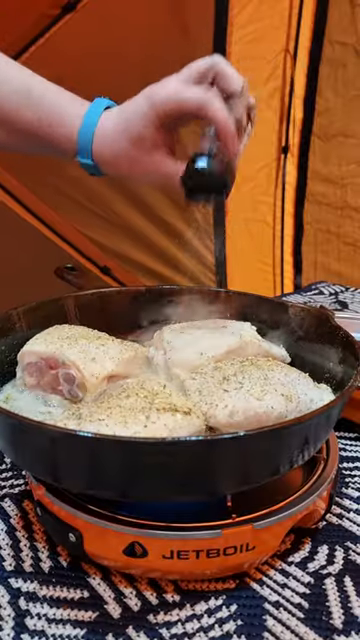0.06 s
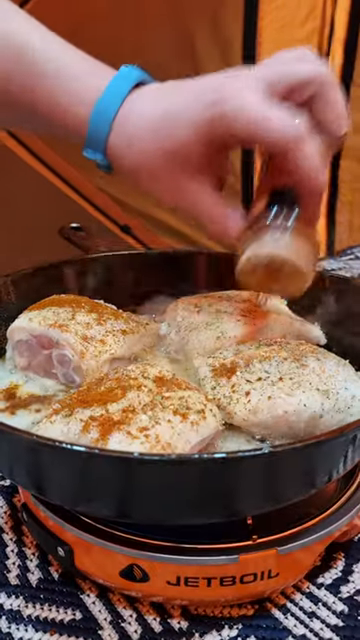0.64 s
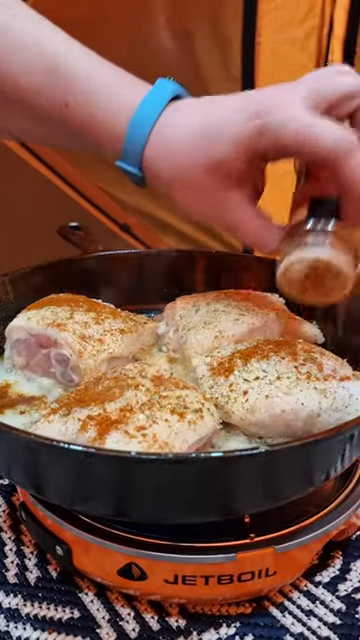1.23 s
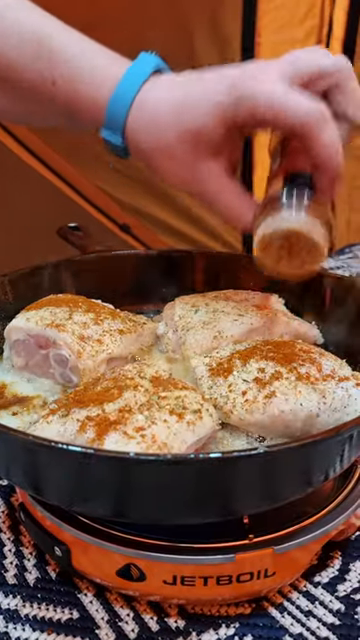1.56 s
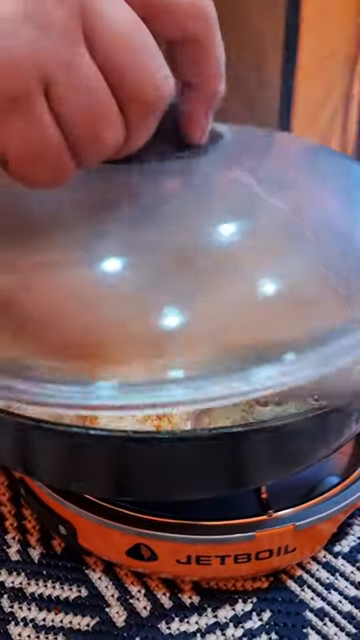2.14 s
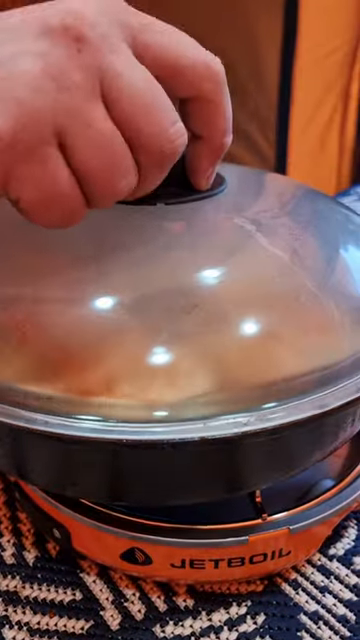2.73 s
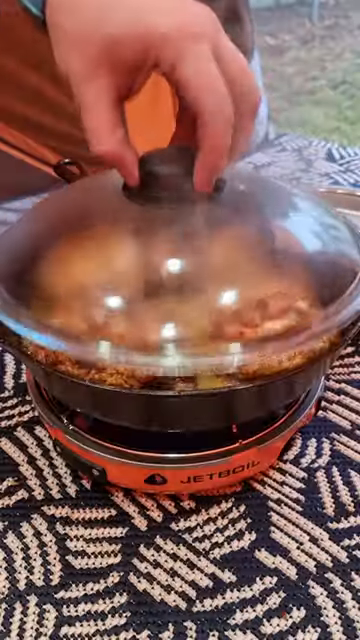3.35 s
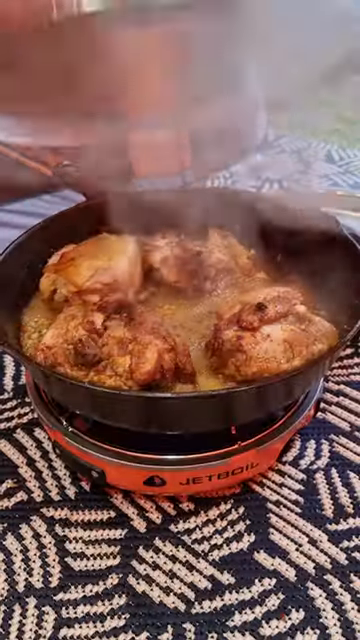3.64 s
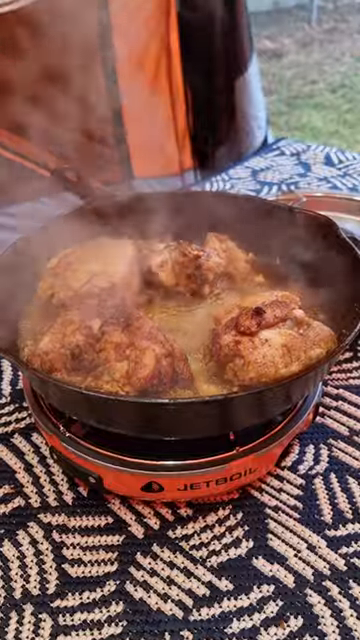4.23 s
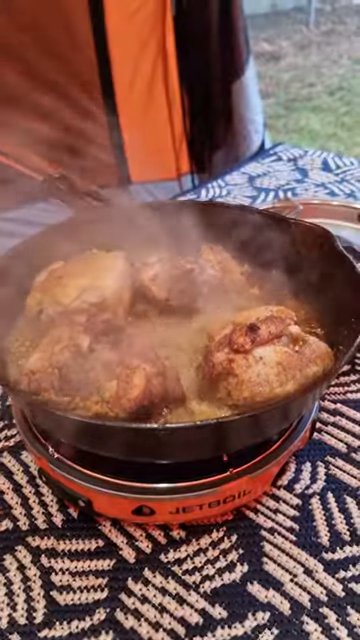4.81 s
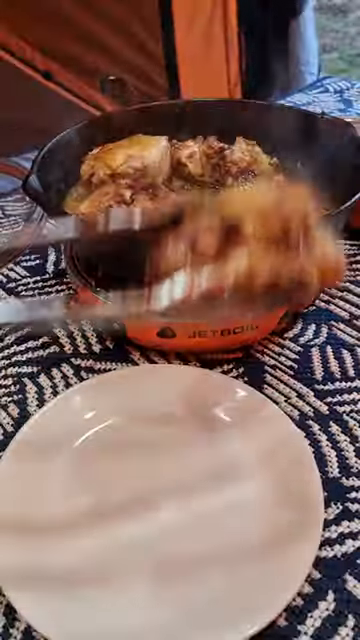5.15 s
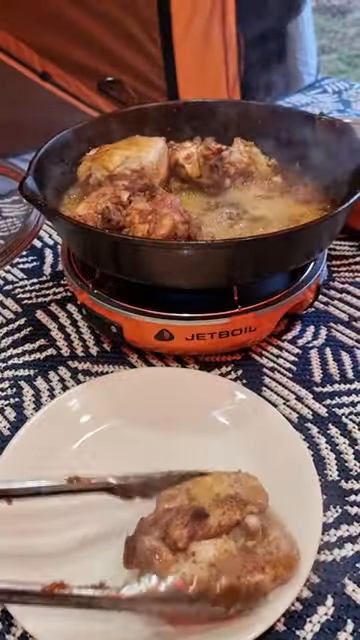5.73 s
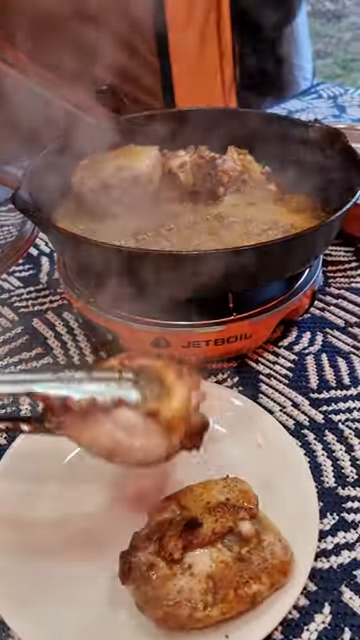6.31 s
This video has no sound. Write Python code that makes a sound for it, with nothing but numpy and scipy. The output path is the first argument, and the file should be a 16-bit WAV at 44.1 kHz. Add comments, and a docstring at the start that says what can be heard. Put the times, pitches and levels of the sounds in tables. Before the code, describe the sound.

Over the low rumble of a gas camp stove, chicken crackles in an iron pan while dry spice is lightly shaken. A glass lid lands in two quick, ringing clatters, the loudest sounds, and the frying goes dull. After a soft scrape as the lid lifts, the sizzle returns stronger, growing into a loud, bubbling boil with snapping fat and little steam spurts. It sounds close, with almost no echo inside the tent.

```python
"""Chicken sizzles in a cast iron skillet on a gas camp stove inside a tent.
Each bursting bubble rings briefly at the pitch of its size; larger ones spit through the fat.
Spice is shaken over the pan, then a glass lid clatters onto the rim, ringing glass and iron, and
muffles the sizzle. The lid is dragged off; the juices simmer, then boil up loudly, with spurts of steam.
The burner rumbles below, and the canvas scatters the sound of the pan."""
import sys
import numpy as np
from scipy import signal
from scipy.fft import rfft, irfft, next_fast_len
from scipy.io import wavfile

SR = 44100
rng = np.random.default_rng(int(sys.argv[2]) if len(sys.argv) > 2 else 0)


def to_wav(s):
    """Save 16-bit WAV."""
    ch = np.atleast_2d(s).T  # columns
    pcm = np.round(np.clip(ch, -1, 1) * 32767)  # PCM
    wavfile.write(sys.argv[1], SR, pcm.astype(np.int16))


N = 285327
TIME = np.arange(N) / SR
SIMMER_FROM_S, BOIL_FROM_S = 3.22, 5.1

# phase lead of the left channel over the right, for the whole pan: frequency_hz, lead_rad
PAN_PHASE = [(100, 0.058), (450, 0.65), (700, 1.74), (1200, 3.36), (1500, 4.24), (1900, 6.66), (2600, 8.92),
             (3800, 8.32), (5000, 10.96), (7500, 11.2)]
# normal modes of the skillet: pitch_hz, level_db, t60_s
IRON_MODES = [(402, -23.5, 0.52), (603, -24, 1), (646, -20.5, 0.18), (838, -13.5, 0.2),
              (1005.5, -0.5, 0.14), (1301, -3, .15), (1320, -24, 0.74), (1435, -14, 0.21),
              (1750, -34, 0.049), (1880, -12.5, 0.25), (2170, -16, 0.077), (2420, -3, 0.21),
              (2503, -26, 0.27)]


def sizzle(crackle_db, fizz_db):
    """Bubble populations superpose: crackle in three stages, lone pings, a low gurgle, a fine fizz."""
    # spectral envelope of each population: frequency_hz, gain_db
    sear_spectrum = [(200, -3), (480, -7), (800, 2.5), (1200, 0.5), (2000, 3.5), (3000, 2), (5000, -3),
                     (7200, -9), (9000, -21), (14000, -66)]
    simmer_spectrum = [(200, -10.5), (420, -12), (950, -14), (1300, -7), (1750, -3.5), (2400, -5.5),
                       (3600, -7), (5000, -11), (7200, -23), (9000, -31.5), (14000, -33)]
    boil_spectrum = [(250, -46), (680, -14.5), (1000, -19.5), (1500, -11), (2300, -2), (3000, -2),
                     (4000, -6.5), (5500, -13), (7500, -18.5), (9000, -25.5), (14000, -25.5)]
    ping_spectrum = [(900, -47), (2000, 3), (4000, 7.5), (7000, 4.5), (9000, -9.5), (15000, -46)]
    gurgle_spectrum = [(250, -14.5), (450, 5), (700, 4.5), (1100, -1), (1800, 7), (4000, -41)]
    fizz_spectrum = [(3000, -24), (7000, 3), (9000, 2), (11500, 1), (16000, 7)]
    # phase lead of the left channel, for the juice: frequency_hz, lead_rad
    juice_phase = [(100, .15), (450, 2.4), (700, 1.33), (1200, 2.7), (2000, 5.4), (3000, 8.3), (4000, 14.3),
                   (5000, 20), (6300, 21.3), (8000, 27.1)]
    # large slow bubbles well up: centre_s, level_db, half_length_s
    wellings = [(3.3, -48.5, 0.22), (5.48, -39, 0.068), (5.95, -40, 0.25), (6.18, -37.5, 0.022)]
    end_s = N / SR
    searing, simmering, boiling = (0, SIMMER_FROM_S), (SIMMER_FROM_S, BOIL_FROM_S), (BOIL_FROM_S, end_s)
    before_boil, juicy, always = (0, BOIL_FROM_S), (SIMMER_FROM_S, end_s), (0, end_s)
    sear = bubbles(PAN_PHASE, searing, density=6000, spread_db=6, clump_db=1.6, width=0.3, wet_db=0.5)
    simmer = bubbles(PAN_PHASE, simmering, density=4000, spread_db=3.5, clump_db=1.5, width=0.29,
                     wet_db=0)
    boil = bubbles(juice_phase, boiling, density=8000, spread_db=4, clump_db=1.78, width=0.13,
                   wet_db=1, bands=38)
    pings = bubbles(PAN_PHASE, before_boil, density=99, spread_db=3.5, clump_db=1.5, width=0.12,
                    wet_db=-4)
    gurgle = bubbles(juice_phase, juicy, density=4000, spread_db=2, clump_db=2.06, width=0.1,
                     wet_db=-9.5)
    fizz = bubbles(PAN_PHASE, always, density=7000, spread_db=4.6, clump_db=2.2, width=0.45, wet_db=8)
    crackle = (unit_rms_within(colour(sear, sear_spectrum), searing)
               + unit_rms_within(colour(simmer, simmer_spectrum), simmering)
               + unit_rms_within(colour(boil, boil_spectrum), boiling)
               + from_db(-8) * unit_rms(colour(pings, ping_spectrum)))
    return (from_db(crackle_db) * crackle
            + swells(wellings) * unit_rms_within(colour(gurgle, gurgle_spectrum), juicy)
            + from_db(fizz_db) * unit_rms(colour(fizz, fizz_spectrum)))


def bubbles(phase_lead, span_s, density, spread_db, clump_db, width, wet_db, bands=20):
    """Bubbles burst in random clumps, each a damped resonator tuned by its size; width is 1 / Q."""
    start, stop = (np.clip(span_s, 0, N / SR) * SR).astype(int)
    out, shared_drift = np.zeros((2, N)), drift(22)
    for hz in np.geomspace(300, 15000, bands):
        clumps = from_db(clump_db * (shared_drift + drift(45))[start:stop])
        chance = density * clumps * np.sqrt(hz / 1000) / bands / SR   # small bubbles outnumber large
        bursts = rng.random(N)[start:stop] < chance
        strengths = rng.exponential(1, N)[start:stop][bursts]
        polarity = (-1) ** np.arange(len(strengths))
        clicks = np.zeros(stop - start)
        clicks[bursts] = from_db(spread_db * np.minimum(strengths, 4.2)) * polarity
        out[:, start:stop] += tent(resonance(unit_rms(clicks), hz, width * hz), phase_lead, wet_db)
    return out


def cooking_levels():
    """Crackle, fizz and flame boom follow the cooking's vigour; the lid's insertion loss dims the pan."""
    # sear, simmer, boil: crackle_db, fizz_db, boom_db, vigour_change_db, ramp_s, lid_loss_db
    stages = [(-44, -56, -50.5, -5.5, 3.3, 6.5), (-35.5, -55.5, -44, -1, 2.4, 13),
              (-32, -57.5, -49, 7.5, 0.76, 0)]
    starts_s = np.array([0, SIMMER_FROM_S, BOIL_FROM_S])
    stage = np.searchsorted(starts_s[1:], TIME)
    crackle_db, fizz_db, boom_db, change_db, ramp_s, lid_loss_db = np.array(stages)[stage].T
    vigour_db = change_db * np.clip((TIME - starts_s[stage]) / ramp_s, 0, 1)
    vigour_db -= np.interp(TIME, [5.6, 5.7], [0, 2])   # the boil drops 2 dB at 5.6 s, then keeps climbing
    covered_s, lifted_s, clear_s = 2.45, 3.3, 3.504
    muffle_db = lid_loss_db * np.interp(TIME, [covered_s, lifted_s, clear_s], [1, 1, 0], left=0)
    return (crackle_db + vigour_db - muffle_db,
            fizz_db + 1.62 * vigour_db - 0.6 * muffle_db,
            boom_db + 0.5 * vigour_db)


def fat_spits():
    """Impulse excitation: a large steam bubble snaps through the fat with a crack and a short ring."""
    # the loudest spits: start_s, level_db, pitch_hz
    spits = [(0.0288, -31.5, 1980), (0.0713, -29.5, 1750), (0.3618, -30, 2040), (0.398, -22, 3160),
             (0.487, -23.5, 1610), (0.5326, -21, 2840), (1.0188, -28.5, 1900), (1.2456, -25, 2200),
             (1.5306, -28.5, 1950), (1.703, -33.5, 1970), (1.8055, -29, 1880), (1.949, -23.5, 3480),
             (1.9601, -22, 3900), (1.9764, -27, 1830), (3.1416, -29, 2930), (3.2454, -33, 1630),
             (3.5184, -33.5, 1660), (3.7618, -16.5, 1770), (3.7684, -24, 1870), (3.8348, -21.5, 1860),
             (4.4233, -21, 1840), (4.592, -23, 1270), (4.6023, -20, 1740), (4.8379, -22, 1850),
             (4.8915, -23, 1750), (5.0474, -22, 1700), (5.0809, -19, 2880), (5.3452, -17.5, 2446),
             (6.0646, -12, 1860), (6.2483, -16, 2020), (6.4378, -15.5, 2090)]
    out, t = np.zeros((2, N)), np.arange(SR // 5) / SR
    for start_s, level_db, hz in spits:
        burst = (t == 0) + 0.057 * rng.standard_normal(len(t)) * decay(t, 0.047)   # impulse and spray
        ring = resonance(resonance(burst, hz, 0.5 * hz), hz, 0.48 * hz)
        crack = butter(butter(burst, 700, "high"), 4900, "low", order=4)
        snap = from_db(-0.5) * ring / np.abs(ring).max() + from_db(-1.5) * crack / np.abs(crack).max()
        add(out, start_s - 0.0005, tent(from_db(level_db) * snap, PAN_PHASE, wet_db=-2))
    return out


def steam_spurts():
    """Atomisation: jets of steam spray fine droplets of fat, heard as brief hisses."""
    # steam jets: centre_s, level_db
    jets = [(3.583, -45.5), (3.638, -39.5), (4.038, -42), (4.085, -39), (4.549, -38.5), (5.062, -38.5),
            (5.757, -37), (6.076, -35.5)]
    # spectral envelope of the spray: frequency_hz, gain_db
    spray_spectrum = [(3000, 2.5), (6500, -6.5), (9000, 0.5), (16000, -7)]
    droplets = puffs([(s, db, 0.0062) for s, db in jets], per_s=3100)
    return tent(colour(droplets, spray_spectrum), PAN_PHASE, wet_db=2)


def lid_clatter():
    """Impacts excite the modes of iron and glass; the lid's edge grates and the stove thuds beneath."""
    # the lid meets the rim: start_s, strength_db, thud_db, thud_hz
    knocks = [(2.203, -43, -62, 397), (2.222, -19, -26, 463), (2.235, -21.5, -25, 382),
              (2.252, -20.5, -32.5, 187), (2.33, -39, -53, 408), (2.386, -48, -38, 413),
              (2.508, -24, -18, 352), (2.519, -26, -34, 358), (2.541, -13.5, -13, 320),
              (2.559, -26, -16.5, 359), (2.599, -35.5, -19, 336), (2.646, -27, -14, 208.4),
              (2.655, -23.5, -35, 245), (2.662, -12, -9.5, 217), (2.68, -22.5, -37, 246)]
    # normal modes of the lid: pitch_hz, level_db, t60_s
    glass_modes = [(325, -2, 0.1), (710, -11, 0.058), (826, 8, 0.029), (1320, -2, 0.027), (2520, 3, 0.066),
                   (2890, 3.5, 0.1), (2994, 1, 0.13), (2970, -2.5, 0.15), (3460, -36, 0.078),
                   (3770, -7, 0.094), (4200, 0.5, 0.034), (4614, 3, 0.044), (5365, -10, 0.075),
                   (5370, -7, 0.089), (5700, -24, 0.2), (6100, -13.5, 0.13), (7100, -30, 0.2),
                   (7460, -9.5, 0.094), (7550, -28, 0.15), (8480, -41, .12), (9325, -22, 0.12),
                   (11040, -45, 0.1), (12900, -31, 0.16), (14700, -36, .1)]
    stove_hz, stove_db = 92, -22.5
    out, t = np.zeros((2, N)), np.arange(SR // 2) / SR
    for start_s, strength_db, thud_db, thud_hz in knocks:
        # settling slowly, then fast, the lid damps the iron, rings more itself and grates more brightly
        settled = np.interp(start_s, [knocks[0][0], knocks[-1][0]], [0, 1]) ** 2.73
        iron_db = np.interp(settled, [0, 1], [2.5, -28])
        glass_db = np.interp(settled, [0, 1], [-16.5, -1.5])
        grate_hz = np.interp(settled, [0, 1], [2100, 4700])
        balance_db = np.interp(settled, [0, 1], [-1, -0.5])   # left minus right
        grate = butter(butter(rng.standard_normal(len(t)), grate_hz, "low"), 4500, "low", order=1)
        crack = unit_rms(grate) * decay(t, 0.08)
        thud = from_db(thud_db) * np.sin(2 * np.pi * thud_hz * t) * decay(t, 0.12)
        rings = from_db(iron_db) * struck(IRON_MODES, t) + from_db(glass_db) * struck(glass_modes, t)
        knock = from_db(strength_db) * (rings + crack) + thud
        knock = butter(knock, 160, "high", order=3)   # the knock keeps nothing below about 160 Hz
        rocking = from_db(thud_db + stove_db) * np.sin(2 * np.pi * stove_hz * t) * decay(t, 0.2)
        balance = from_db([[balance_db / 2], [-balance_db / 2]])
        add(out, start_s - 0.0015, balance * tent(knock + rocking, PAN_PHASE, wet_db=-9))
    return out


def struck(modes, t, uneven_db=2):
    """Modal superposition: random strengths and phases stand for where the blow lands."""
    hz, db, t60_s = np.array(modes).T[:, :, None]
    strength = from_db(db + uneven_db * rng.standard_normal(hz.shape))
    partials = strength * decay(t, t60_s) * np.sin(2 * np.pi * (hz * t + rng.random(hz.shape)))
    attack = 1 - decay(t, 0.0015)
    return partials.sum(axis=0) * attack


def lid_drag():
    """Friction on the rim softly drives the low modes of the iron as the lid is lifted."""
    # rubs: centre_s, level_db, half_length_s
    drags = [(3.25, -45, 0.0043), (3.32, -41, 0.045)]
    rubbing = butter(puffs(drags, per_s=1100), 820, "low", order=1)
    rings = sum(resonance(rubbing, hz, width_hz=29) for hz, _, _ in IRON_MODES)
    rings += 1.7 * resonance(rubbing, 403, width_hz=71)
    return tent(from_db(12) * rings, PAN_PHASE, wet_db=2.5)


def spice_shaker():
    """Granular impact noise: each shake throws dry grains against the cap."""
    # shakes: centre_s, level_db
    shakes = [(.2, -50.5), (.39, -51), (.56, -48), (.722, -48), (1.291, -49), (1.524, -43), (1.981, -42.5)]
    # spectral envelope of the grains: frequency_hz, gain_db
    grain_spectrum = [(1500, -15), (4000, 15), (7000, 6), (9500, 0.5), (13000, 1), (16000, -5)]
    grains = puffs([(s, db, 0.012) for s, db in shakes], per_s=11000)
    return tent(colour(grains, grain_spectrum), PAN_PHASE, wet_db=-18)


def burner(boom_db):
    """Combustion noise: the gas flame roars low and booms at two pitches, nearly alike left and right."""
    # spectral envelope of the roar: frequency_hz, gain_db
    roar_spectrum = [(20, -19), (38, -9.5), (60, 0.5), (85, -18), (130, -2), (160, -8.5), (220, -5),
                     (300, -15), (450, -8), (900, -28.5), (3000, -65)]
    # resonances of the boom: pitch_hz, half_width_hz, level_db
    boom_bands = [(73.2, 10.7, -3), (117.8, 8.1, -7.5)]
    turbulence = rng.standard_normal(N) + 0.57 * rng.standard_normal((2, N))
    roar = unit_rms(colour(turbulence, roar_spectrum))
    boom = np.zeros(N)
    for hz, half_width_hz, level_db in boom_bands:
        band = resonance(rng.standard_normal(N), hz, 2 * half_width_hz)
        boom += from_db(level_db) * unit_rms(resonance(band, hz, 2 * half_width_hz))
    flare_db = 5 * np.exp(-((TIME - 6.35) / 0.19) ** 2)   # the flame flares up once
    return from_db(-53.5) * roar + from_db(boom_db + flare_db) * boom


def tent(x, phase_lead, wet_db, jitter_s=0.00002):
    """Multipath propagation from one spot of the pan: direct sound, then scatter off iron and canvas."""
    # spectral envelope of the reflections: frequency_hz, gain_db
    scatter_spectrum = [(300, 1), (550, 2), (1500, 3.5), (4000, 2), (7000, 1), (15000, -9.5)]
    t60_s, wall_echo_s = 0.085, 0.007
    size, delay_samples = 8192, 64
    t, hz = np.arange(size) / SR, np.fft.rfftfreq(size, 1 / SR)
    phase = at_hz(phase_lead, hz) + 2 * np.pi * hz * rng.normal(0, jitter_s)
    direct = irfft(np.exp(0.5j * phase * np.array([[1], [-1]])))
    envelope = decay(t, t60_s) * (1 + 0.6 * np.exp(-((t - wall_echo_s) / 0.0018) ** 2))
    reflections = unit_rms(rng.standard_normal((2, size)) * envelope) / np.sqrt(size)
    scatter = colour(reflections, scatter_spectrum)
    paths = np.roll(direct + from_db(wet_db) * scatter, delay_samples, axis=1)
    return signal.fftconvolve(x[None], paths, axes=1)[:, :len(x)]


def puffs(rows, per_s):
    """Shot noise: tiny random impacts, gathered in short swells."""
    return swells(rows) * unit_rms(rng.standard_normal(N) * (rng.random(N) < per_s / SR))


def swells(rows):
    """Gaussian envelopes from rows of centre_s, level_db, half_length_s."""
    return sum(from_db(db) * np.exp(-((TIME - s) / half_s) ** 2) for s, db, half_s in rows)


def drift(knots_per_s):
    """Slow random modulation of unit RMS."""
    knots = rng.standard_normal(2000)
    return unit_rms(np.interp(TIME * knots_per_s, np.arange(len(knots)), knots))


def decay(t, t60_s):
    """Exponential damping, 60 dB in t60_s."""
    return np.exp(-np.log(1000) * t / t60_s)


def resonance(x, hz, width_hz):
    """Two-pole resonator with unit peak gain."""
    radius = np.exp(-np.pi * width_hz / SR)
    feedback = [1, -2 * radius * np.cos(2 * np.pi * hz / SR), radius ** 2]
    return signal.lfilter(np.array([1, 0, -1]) * (1 - radius ** 2) / 2, feedback, x + 1e-18)


def butter(x, hz, kind, order=2):
    """Maximally flat low-pass or high-pass filter."""
    return signal.sosfilt(signal.butter(order, hz, kind, fs=SR, output="sos"), x)


def colour(x, spectrum):
    """Zero-phase filtering by a spectral envelope."""
    size = next_fast_len(x.shape[-1] + 4096)
    gain = from_db(at_hz(spectrum, np.fft.rfftfreq(size, 1 / SR)))
    return irfft(rfft(x, size) * gain, size)[..., :x.shape[-1]]


def at_hz(points, hz):
    """Interpolation on a log-frequency axis."""
    frequency_hz, values = np.array(points).T
    return np.interp(np.log(hz + 1e-9), np.log(frequency_hz), values)


def from_db(db):
    """Amplitude ratio of a level."""
    return 10 ** (np.asarray(db) / 20)


def unit_rms(x):
    """Normalisation to unit power."""
    return x / np.sqrt(np.mean(x ** 2) + 1e-20)


def unit_rms_within(x, span_s):
    """Normalisation to unit power within a span of time."""
    inside = (TIME > span_s[0]) & (TIME < span_s[1])
    return x / np.sqrt(np.mean(x[:, inside] ** 2) + 1e-20)


def add(out, start_s, sound):
    """Superposition of a sound from start_s on."""
    start = round(start_s * SR)
    out[:, start:start + sound.shape[-1]] += sound[:, :N - start]


def scene():
    """All sources superpose; the channels differ in level by frequency."""
    # level difference between the channels: frequency_hz, left_minus_right_db
    tilt = [(60, -3), (99, -1), (160, -2.5), (270, 1), (450, 0.5), (740, 1), (1220, 5), (2010, -2.5),
            (3330, 0.0), (5500, 2.5), (9080, 5.5), (15000, 2.5)]
    crackle_db, fizz_db, boom_db = cooking_levels()
    cooking = sizzle(crackle_db, fizz_db) + fat_spits() + steam_spurts()
    left, right = cooking + spice_shaker() + lid_clatter() + lid_drag() + burner(boom_db)
    half_tilt = np.array(tilt) * [1, 0.5]
    return np.array([colour(left, half_tilt), colour(right, half_tilt * [1, -1])])


def record(dry):
    """Hard clipping at full scale, then band limiting by a steep low-pass."""
    cutoff_hz = 15900
    low_pass = signal.ellip(10, 0.1, 80, cutoff_hz, fs=SR, output="sos")
    return signal.sosfilt(low_pass, np.clip(dry, -1, 1))


dry = scene()
out = record(dry)
to_wav(out)
```